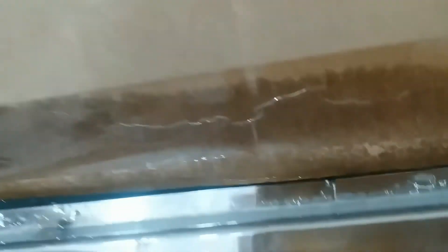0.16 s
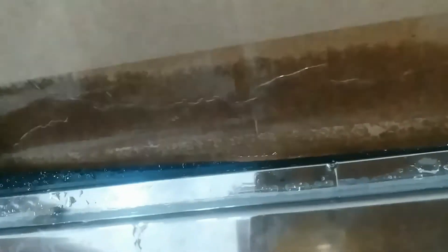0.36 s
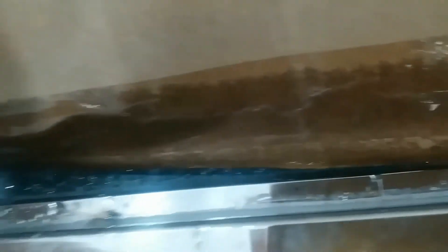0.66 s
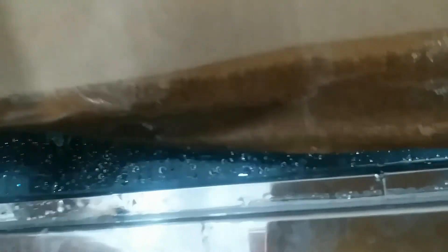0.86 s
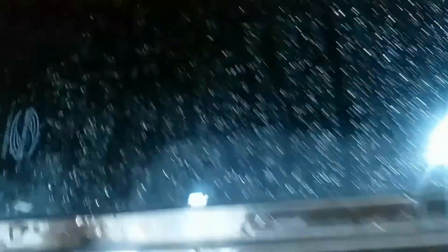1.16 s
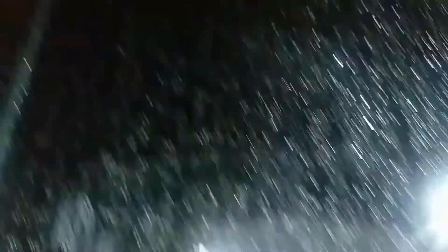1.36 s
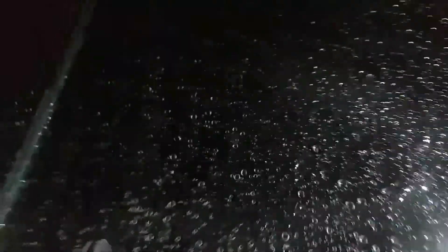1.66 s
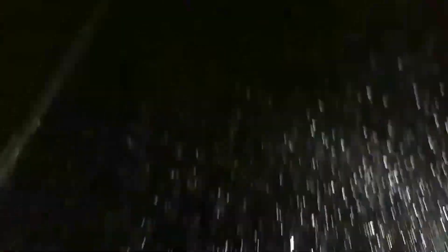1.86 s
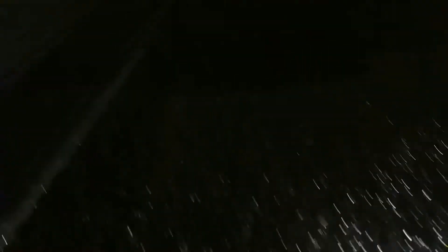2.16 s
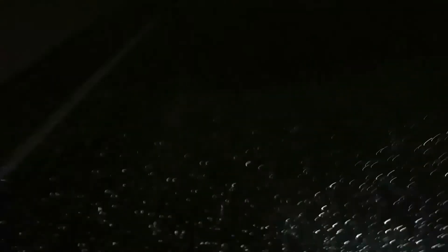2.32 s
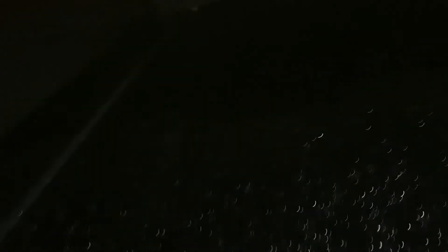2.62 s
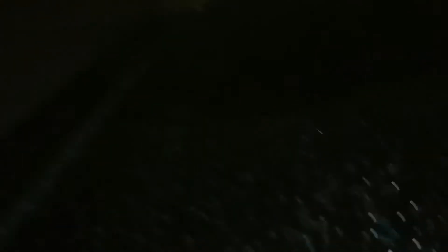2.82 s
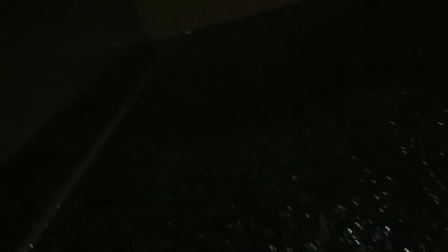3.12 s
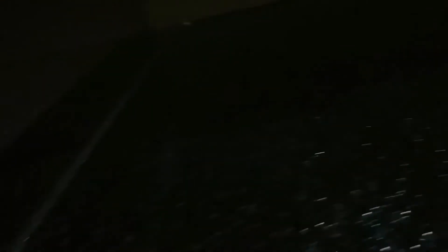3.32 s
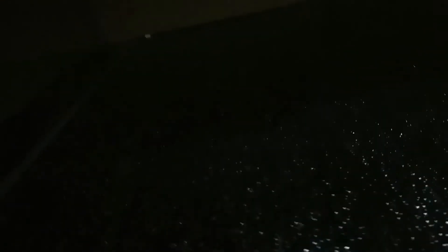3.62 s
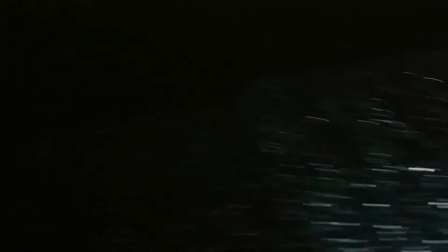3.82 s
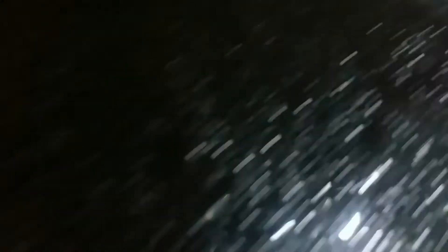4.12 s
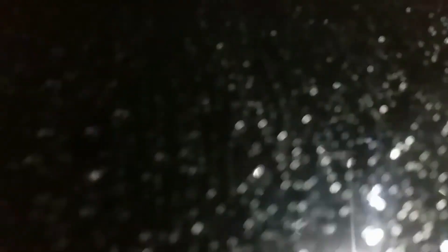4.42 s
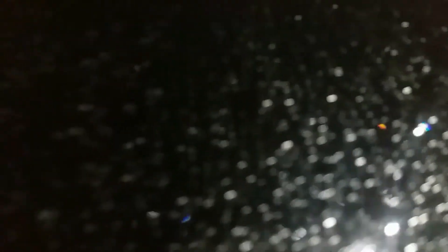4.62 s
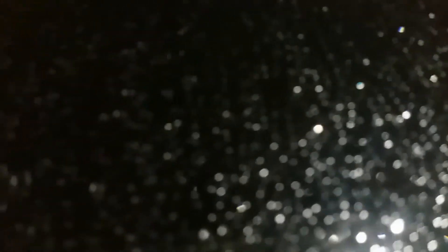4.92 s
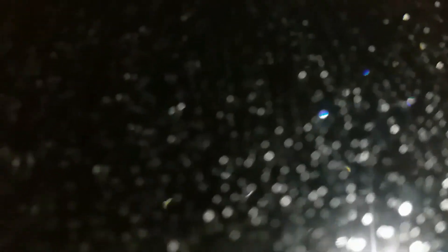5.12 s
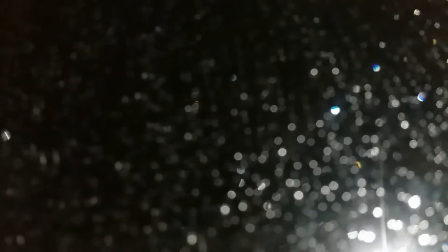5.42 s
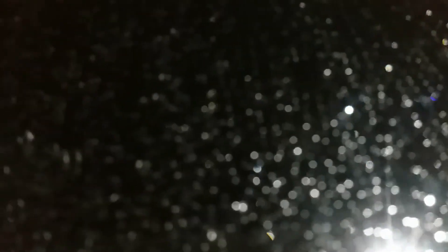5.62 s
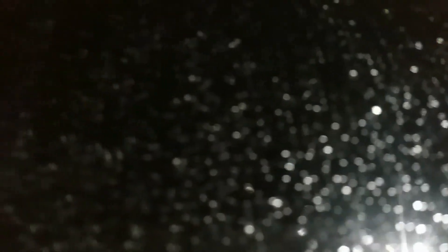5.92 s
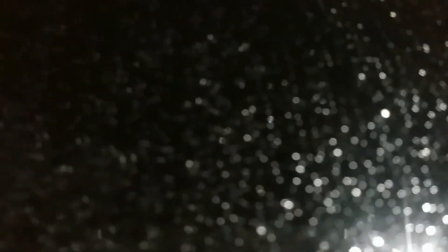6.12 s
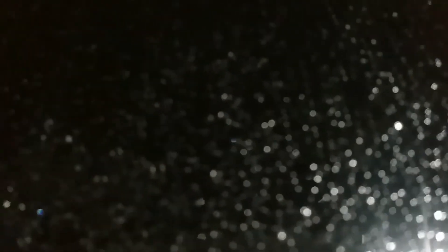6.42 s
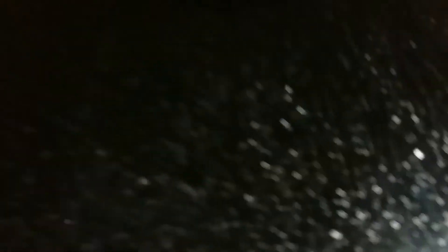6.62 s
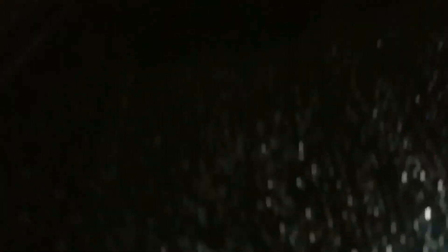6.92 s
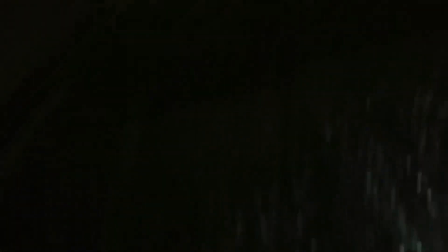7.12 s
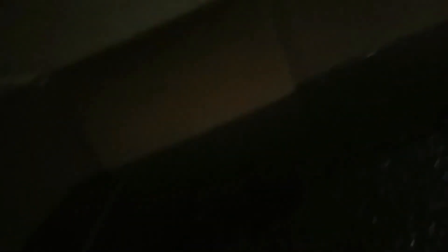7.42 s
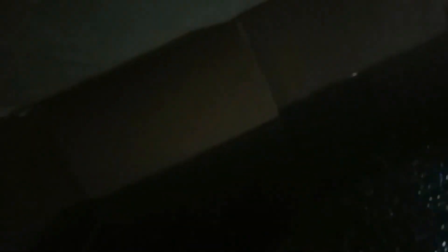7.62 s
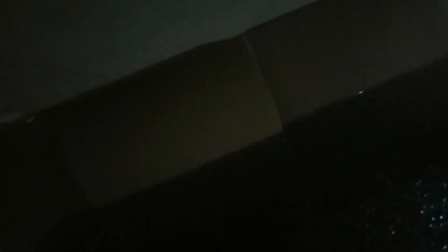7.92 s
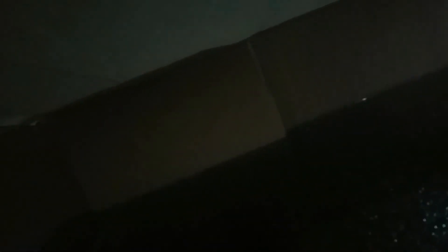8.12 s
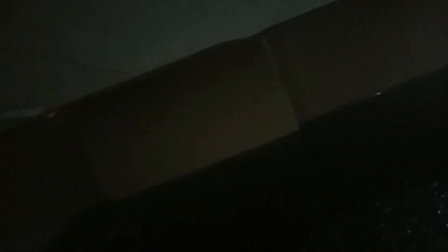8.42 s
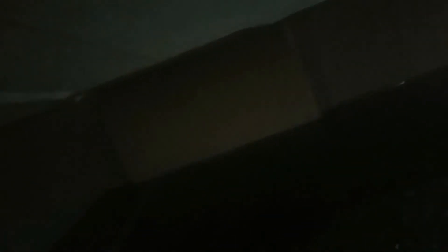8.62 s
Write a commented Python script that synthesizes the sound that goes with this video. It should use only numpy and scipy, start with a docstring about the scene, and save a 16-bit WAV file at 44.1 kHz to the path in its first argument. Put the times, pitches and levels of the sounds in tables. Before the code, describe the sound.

Taped cardboard rustles and clatters loudly aside at a window, then heavy hollow drips thud about once a second over light pattering rain.

```python
"""A room at a window covered with taped cardboard, with light rain falling outside.
The cardboard rustles, is pushed aside with a loud clatter and later settles back: filtered noise
for rubbing, ringing modes for the frame, sparse grains for the crackle, sharp swings for the tape.
A heavy drip thuds on a hollow ledge about once a second, built from decaying sines.
Fine drops tick on the sill as short sprays of noise, one rings on metal, and a soft wash lies behind."""
import sys
import numpy as np
from scipy import signal
from scipy.io import wavfile

SR = 44100
rng = np.random.default_rng(int(sys.argv[2]) if len(sys.argv) > 2 else 0)


def inscribe(sig):
    """Save sig as 16-bit PCM at rate SR to the path in sys.argv[1].

    A 1-D sig is mono; a 2-D sig holds one channel per row.
    Samples are clipped to [-1, 1] before scaling.
    """
    pcm = np.round(np.clip(np.atleast_2d(sig).T, -1, 1) * 32767)
    wavfile.write(sys.argv[1], SR, pcm.astype(np.int16))


N = 386104

# Cardboard bumping the frame: (time [s], knock level [dB], contact pitch [Hz], crackle level [dB])
BUMP_EVENTS = [(.134, -24.5, 600, -50), (1.1128, -11.5, 710, -34.5), (1.181, -10, 510, -37),
               (1.197, -7.5, 560, -30), (1.211, -5.5, 170, -17), (1.237, -13, 760, -23),
               (1.258, -9.5, 340, -25.5), (1.347, -16.5, 560, -22.5), (1.392, -17.5, 150, -30),
               (2.474, -44, 900, -45.5), (5.801, -42.5, 400, -44.5), (7.51, -32.5, 179, -41),
               (7.642, -30.5, 330, -37.5), (8.193, -30, 240, -41), (8.717, -32.5, 196, -55)]
# Ringing modes of the frame: (frequency [Hz], relative level [dB], t60 [s])
FRAME_MODES = [(101.4, -6, 0.26), (117, -4, 0.22), (141, -1.5, 0.062), (166, -28, 0.091), (182.6, 3, 0.07),
               (309.7, 0, 0.132), (373.5, 1, 0.17), (427, -1, 0.1), (513, -5, 0.064), (566, -4.5, 0.058),
               (641, 1, 0.037), (732, 0, 0.063), (864, -1, 0.025), (1204, -6.5, 0.027), (1600, -3.5, 0.016),
               (2180, -31, 0.044)]
# Resonances of the crackling cardboard: (frequency [Hz], width [Hz], relative level [dB])
SHEET_RESONANCES = [(394, 73, -6.5), (753, 120, -3), (1253, 48, -11), (1850, 200, -8.5), (2080, 140, -4),
                    (2324, 220, -6), (4000, 1400, -7), (5070, 1100, -18)]
# Hiss of the crackling fibres: (frequency [Hz], relative density [dB per Hz])
CRACKLE_SPECTRUM = [(300, -5), (750, -4.5), (1400, 4.5), (2300, -8), (3100, -17), (4400, -7), (6000, -11),
                    (8000, -34), (11000, -36), (16000, -33)]
# Hum left in the pane by a hard blow: (time [s], frequency [Hz], level [dB], t60 [s])
PANE_HUMS = [(1.209, 150.4, -20.5, 1.12)]
# Stiff tape letting go: (time [s], level [dB], pitch [Hz])
TAPE_SNAPS = [(7.6424, -11, 1130), (7.6923, -26.5, 1390), (8.7196, -23.5, 1580)]
# The sheet pushed aside: (time [s], relative rubbing level [dB], rumble level [dB])
PUSH_CURVE = [(0, -42.5, -52), (.5, -43.5, -55), (.95, -55, -58), (1.15, -35.5, -53), (1.5, -44, -34),
              (1.62, -51, -52), (1.83, -44, -61), (2.05, -79, -70)]
# The sheet settling back: (time [s], relative rubbing level [dB], rumble level [dB])
SETTLE_CURVE = [(7.15, -62, -62), (7.27, -46, -43), (7.4, -49, -56), (7.55, -41.5, -47), (7.8, -46, -62),
                (8.05, -41.5, -51), (8.28, -44, -42.5), (8.48, -46, -55.5), (8.76, -46.5, -49)]
# Quick swishes along the frame: (time [s], half length [s], relative level [dB])
SWISHES = [(0.02, 0.062, -45.5), (0.15, 0.025, -35.5), (0.335, 0.078, -43), (0.625, 0.023, -42.5),
           (0.826, 0.031, -45), (1.181, 0.027, -31.5), (7.982, 0.056, -45), (8.595, 0.031, -51.5)]
# Rubbing of sheet on frame: (frequency [Hz], relative density [dB per Hz])
RUB_SPECTRUM = [(200, -0.5), (450, -0.5), (1000, -3.5), (1500, -2), (2200, -2), (3200, -14), (5000, -8),
                (9000, -53)]
# Fine hiss of brushing cardboard: (frequency [Hz], relative density [dB per Hz])
BRUSH_SPECTRUM = [(1500, -27), (3000, 2.5), (4800, -3), (8000, -3.5), (12000, -4.5), (16000, -6.5)]
# An edge scuffing along the frame: (time [s], half length [s], level [dB], pitch [Hz])
EDGE_SCUFFS = [(7.282, 0.053, -49, 3740), (8.053, 0.013, -38, 1390), (8.101, 0.023, -43, 850),
               (8.668, 0.015, -44, 900)]
# Ringing modes of the hollow ledge: (frequency [Hz], relative level [dB], t60 [s])
LEDGE_MODES = [(104, -29, .2), (134, -33, 0.15), (204.8, -26, 0.16), (180.2, -15.5, 0.21),
               (290, -19, 0.084), (347, -26, 0.16), (430, -15.5, 0.038), (436, 0, 0.012),
               (680.6, -40, 0.15), (717, -35, 0.055), (1098, -36.5, 0.048)]
# Drops striking metal: (time [s], relative level [dB])
METAL_DROPS = [(6.0408, -28.5)]
# Ringing modes of the metal: (frequency [Hz], relative level [dB], t60 [s])
METAL_MODES = [(1830, -19, 0.072), (1997, 4.5, 0.036), (2220, -7, .05), (2275, -4, 0.059), (2655, -13, .06),
               (3580, -12, .03), (4470, -12, 0.03)]
# Loudest drops on the sill: (time [s], relative level [dB], pitch [Hz])
NEAR_DROPS = [(0.053, -29.5, 5690), (1.6116, -32.5, 9150), (2.2625, -29, 5600), (2.539, -35.5, 11100),
              (2.858, -38.5, 12400), (2.9326, -36, 8330), (2.99, -38.5, 3560), (3.1497, -35.5, 8000),
              (3.886, -33, 12100), (4.0681, -35.5, 8530), (4.134, -33.5, 5770), (4.326, -35.5, 4340),
              (4.359, -31.5, 4250), (4.429, -35, 12000), (4.563, -35.5, 5940), (4.9272, -32.5, 5950),
              (5.0084, -35, 12200), (5.7106, -30, 11500), (6.192, -34.5, 4200), (6.2441, -34, 4370),
              (6.8423, -36, 4370), (6.938, -35.5, 4190), (7.039, -35, 3740), (7.1034, -28.5, 3280),
              (7.4754, -30.5, 10400), (7.6547, -25, 4180), (7.796, -32, 11800), (8.195, -30, 5860)]
# Distant rain wash: (frequency [Hz], relative density [dB per Hz])
RAIN_SPECTRUM = [(30, -46), (50, -1.5), (80, 2), (130, 1), (200, 0.5), (320, -3.5), (550, -2.5), (850, -4),
                 (1300, -6), (2200, -7.5), (3500, -9.5), (6000, -15.5), (9500, -18.5), (16000, -19.5)]
# The window recess ringing with the rain: (frequency [Hz], width [Hz], level [dB])
RECESS_RESONANCES = [(117.4, 7.8, -64), (486.6, 13, -61.5), (680, 42, -67.5), (1860, 210, -63.5),
                     (11750, 870, -68)]
# How alike the two ears are: (frequency [Hz], left-right correlation [-1 to 1])
EAR_LIKENESS = [(50, 0.96), (150, 0.82), (300, 0.73), (600, 0.44), (1200, -0.32), (3000, 0.057),
                (12000, -0.083)]

CRACKLE_T60_S = 0.098
# Flexing after a bump: a harder bump makes it only somewhat louder (dB per dB of knock)
WOBBLE_DB, WOBBLE_FOLLOWS, WOBBLE_RISE_S, WOBBLE_HZ = -20.5, 0.64, 0.027, 134.5
STROKE_RUB_DB, SLOW_BRUSH_DB = -1.5, -10.5  # rubbing within a swish; hiss within slow rubbing
# The drip's beat: each gap is a little longer than the one before
FIRST_DRIP_S, DRIP_GAP_S, GAP_GROWS_S, DRIP_DB = 2.3023, 1.0968, .0048, -0.3
# Dull drops lean to the left, bright ones to the right
MIDDLE_HZ, PAN_DB_PER_OCTAVE = 8500, 1
PATTER_DB, PATTER_SPREAD_DB = -30, 12  # loudest patter drop; how much fainter the farthest is
RAIN_DB = -49.5
LULL_S, LULL_HALF_S, LULL_DB = 3.27, 0.34, -2  # the wash eases once
CUTOFF_HZ = 15900


def bumps(contact_width=1.95, hiss_db=-3, ring_db=-1, left_db=1.5):
    """Each contact favours the frame modes near its own pitch, and the cardboard crackles after it."""
    knocks, crush, t = np.zeros((2, N)), np.zeros((1, N)), seconds(1)
    body = struck(FRAME_MODES, swell_cycles=0.097)
    crackle_shape = fade(t, CRACKLE_T60_S) * (1 - np.exp(-t / 0.0018))
    for s, db, hz, crackle_db in BUMP_EVENTS:
        knock = peak_one(resonance(body, hz, contact_width * hz))
        add(knocks, s, from_db(db) * knock)
        add(crush, s, from_db(crackle_db) * crackle_shape)
    folds = crush * grains(per_s=1400, size_db=3.5)
    ringing = 0
    for hz, width_hz, db in SHEET_RESONANCES:
        even_out = np.sqrt(SR / np.pi / width_hz)  # a narrow band would otherwise come out quieter
        ringing = ringing + from_db(db) * even_out * resonance(folds, hz, width_hz)
    flicker = rms_one(from_db(4.6 * drift(250)))
    hiss = crush * flicker * banded_noise(CRACKLE_SPECTRUM, patchy_db=1.5)
    crackle = from_db(ring_db) * ringing + from_db(hiss_db) * hiss
    lean_left = from_db([[left_db], [-left_db]])
    return room(knocks + crackle * lean_left, wet_db=-0.5, t60=0.24)


def wobble():
    """A low boom swells after each bump and dies away as the flexing sheet comes to rest."""
    power, age = np.zeros((1, N)), seconds(1) / WOBBLE_RISE_S
    swing = age * np.exp(1 - age)
    for s, db, _, _ in BUMP_EVENTS:
        add(power, s, (from_db(WOBBLE_DB + WOBBLE_FOLLOWS * db) * swing) ** 2)
    return np.sqrt(power) * flexing(WOBBLE_HZ)


def struck_pane():
    """The glass rings on after the blow; two close modes beat."""
    out, t = np.zeros((2, N)), seconds(1.5)
    for s, hz, db, t60 in PANE_HUMS:
        pair = np.sin(2 * np.pi * hz * t) + 0.13 * np.sin(2 * np.pi * (hz - 8.5) * t)
        add(out, s, from_db(db) * pair * fade(t, t60))
    return out


def snaps(width=0.9):
    """Tape lets go with one sharp swing: a click through two broad resonances."""
    out, click = np.zeros((2, N)), signal.unit_impulse(SR // 20)
    for s, db, hz in TAPE_SNAPS:
        swing = resonance(resonance(click, hz, width * hz), hz, 2 * width * hz)
        add(out, s, from_db(db) * peak_one(swing))
    return room(out, wet_db=-5, t60=0.12)


def sliding(rumble_hz=98, rub_db=-3, brush_db=0.5):
    """The moving sheet rumbles as it flexes, rubs on the frame and brushes with a fine hiss."""
    slow_rub, rumble = np.add(gains(PUSH_CURVE), gains(SETTLE_CURVE))
    swishes = sum(from_db(db) * swell(s, half_length) for s, half_length, db in SWISHES)
    rub = np.hypot(slow_rub, from_db(STROKE_RUB_DB) * swishes)
    brush = np.hypot(swishes, from_db(SLOW_BRUSH_DB) * slow_rub)
    catching = rms_one(from_db(3.2 * drift(100)))  # the surfaces stick and slip unevenly
    rubbing = rub * catching * banded_noise(RUB_SPECTRUM, patchy_db=1.0)
    brushing = brush * banded_noise(BRUSH_SPECTRUM, patchy_db=1.2)
    return rumble * flexing(rumble_hz) + from_db(rub_db) * rubbing + from_db(brush_db) * brushing


def scuffs(width=0.52):
    """Quick runs of tiny slips, coloured by the edge that makes them."""
    slips, out = grains(per_s=2500, size_db=-2.0), 0
    for s, half_length, db, hz in EDGE_SCUFFS:
        coloured = rms_one(resonance(slips, hz, width * hz))
        out = out + from_db(db) * swell(s, half_length) * coloured
    return out


def heavy_drip(echo_s=0.067, echo_db=-21, splat_db=-44, splat_hz=1900, splat_t60=0.28, count=6):
    """Each drip sets the ledge booming, with a faint wet splat and an echo off a wall."""
    out, t = np.zeros((2, N)), seconds(1)
    thud = struck(LEDGE_MODES, swell_cycles=4.75)
    for k in range(count):
        s = FIRST_DRIP_S + k * DRIP_GAP_S + k * (k - 1) / 2 * GAP_GROWS_S
        wet = rms_one(resonance(rng.standard_normal((2, len(t))), splat_hz, 610))
        splat = wet * fade(t, splat_t60)
        add(out, s, from_db(DRIP_DB) * (thud + from_db(splat_db) * splat))
        add(out, s + echo_s, -from_db(DRIP_DB + echo_db) * thud)
    return room(out, wet_db=-5, t60=.25)


def plink(tick_db=-38, tick_t60=0.18):
    """A drop smacks a piece of metal, a little to the left, and leaves its modes ringing."""
    out, t = np.zeros((2, N)), seconds(0.68)
    for s, db in METAL_DROPS:
        tick = rms_one(resonance(rng.standard_normal((2, len(t))), 1300, 3400)) * fade(t, tick_t60)
        add(out, s, from_db(tick_db) * tick)
        ear_gains = from_db(db + np.array([[1], [-2]]))
        add(out, s, ear_gains * struck(METAL_MODES, swell_cycles=0.84))
    return room(out, wet_db=-2.5, t60=0.15)


def sill_drops(near_db=6.5, rebound_db=-9, rebound_s=.025, count=150):
    """Loud near drops among a random patter; each throws a droplet that lands again."""
    out = np.zeros((2, N))
    drops = [(s, db + near_db, hz) for s, db, hz in NEAR_DROPS]
    for when, far, pitch in rng.random((count, 3)):
        drops.append((when * N / SR, PATTER_DB - PATTER_SPREAD_DB * np.sqrt(far), 3500 * 3.6 ** pitch))
    for s, db, hz in drops:
        pan_db = PAN_DB_PER_OCTAVE * np.log2(MIDDLE_HZ / hz)
        gain = from_db(db + pan_db * np.array([[.5], [-.5]]))
        add(out, s, gain * splash(hz))
        add(out, s + rng.uniform(.086, 1) * rebound_s, gain * from_db(rebound_db) * splash(hz))
    return room(out, wet_db=-2.5, t60=0.19)


def splash(hz, t60=0.011, width=0.35, spray_db=-9, low_cut_hz=3300, rise_s=0.00056):
    """A drop bursts: a very short spray of noise with one favoured pitch; peak 1."""
    t = seconds(.02)
    spreading = (1 - np.exp(-t / rise_s)) ** 2
    spray = rng.standard_normal((2, len(t))) * fade(t, t60) * spreading
    pitched = resonance(spray, hz, width * hz)
    return peak_one(high_pass(pitched + from_db(spray_db) * spray, low_cut_hz))


def yard_drops(drop_db=-52, spread_db=8, t60=0.083, count=130):
    """Drops farther off arrive duller, smeared by the walls into soft-edged noise."""
    out, t = np.zeros((2, N)), seconds(.15)
    smear = fade(t, t60) * (1 - np.exp(-t / 0.0045))
    for when, far, pitch in rng.random((count, 3)):
        hz = 1800 * 3.5 ** pitch
        spray = rms_one(resonance(rng.standard_normal((2, len(t))), hz, 1.1 * hz))
        add(out, when * N / SR, from_db(drop_db - spread_db * far) * spray * smear)
    return out


def far_rain():
    """Countless distant drops merge into a wash of noise; the recess rings faintly with it."""
    level = from_db(RAIN_DB + LULL_DB * swell(LULL_S, LULL_HALF_S))
    wash = level * banded_noise(RAIN_SPECTRUM, patchy_db=.7)
    for hz, width_hz, db in RECESS_RESONANCES:
        ringing = resonance(rng.standard_normal((2, N)), hz, width_hz)
        wash = wash + from_db(db) * rms_one(spread_to_ears(ringing, hz))
    return wash


def flexing(hz, width=0.89, side_db=-14):
    """The low boom of a bending sheet, nearly the same at both ears; rms 1."""
    noise = rng.standard_normal((2, N))
    mid, side = resonance(resonance(noise, hz, width * hz), hz, width * hz)
    return rms_one(mid + from_db(side_db) * side * [[1], [-1]])


def grains(per_s, size_db):
    """Sparse clicks at random moments, with random sizes; rms 1."""
    sizes = from_db(size_db * np.minimum(rng.exponential(1, N), 4)) * rng.standard_normal((2, N))
    return rms_one(sizes * (rng.random(N) < per_s / SR))


def struck(modes, swell_cycles):
    """Modes that swell over a few cycles or less, then die away."""
    t, out = seconds(1), 0
    for k, (hz, db, t60) in enumerate(modes):
        shape = fade(t, t60) * (1 - np.exp(-t * hz / swell_cycles))
        out = out + (-1) ** k * from_db(db) * np.sin(2 * np.pi * hz * t) * shape
    return out


def banded_noise(spectrum, patchy_db):
    """Half-octave bands of stereo noise, each with its own flicker and likeness; rms 1."""
    out, edges = 0, 25 * 2 ** np.arange(0, 9.6, .5)
    white = rng.standard_normal((2, 2, N))  # neighbouring bands take turns with two sources
    for k, (low, high) in enumerate(zip(edges, edges[1:])):
        hz = np.sqrt(low * high)
        if spectrum[0][0] / 2 < hz < spectrum[-1][0] * 2:
            band_filter = signal.butter(2, [low, high], "band", fs=SR, output="sos")
            band = signal.sosfilt(band_filter, white[k % 2])
            gain = from_db(at_hz(spectrum, hz) + patchy_db * drift(16))
            out = out + gain * spread_to_ears(band, hz)
    return rms_one(out)


def spread_to_ears(pair, hz):
    """Mix two independent noises into left and right with the correlation for this pitch."""
    mid, side = pair
    alike = np.clip(at_hz(EAR_LIKENESS, hz), -1, 1)
    return np.sqrt(1 + alike) * mid + np.sqrt(1 - alike) * side * [[1], [-1]]


def room(x, wet_db, t60):
    """Direct sound plus diffuse reflections, different at each ear; the bass stays dry."""
    t = seconds(.5)
    tail = high_pass(rng.standard_normal((2, len(t))), 377) * fade(t, t60) * (1 - np.exp(-t / 0.0022))
    reflections = signal.fftconvolve(x, rms_one(tail) / np.sqrt(len(t)), axes=1)[:, :N]
    return x + from_db(wet_db) * reflections


def drift(rate_hz):
    """Slow random wandering with spread 1: low-passed noise drawn every 40 samples."""
    r = np.exp(-80 * np.pi * rate_hz / SR)
    noise = rng.standard_normal(N // 40 + 2002)
    slow = signal.lfilter([1], [1, -2 * r, r * r], noise)[2000:]  # skip the filter's start
    return np.interp(np.arange(N) / 40, np.arange(len(slow)), rms_one(slow))


def swell(s, half_length):
    """A smooth bell-shaped rise and fall around time s."""
    return np.exp(-np.minimum(((np.arange(N) / SR - s) / half_length) ** 2 / 2, 20))


def gains(curve):
    """A curve of levels as one gain per column, practically silent outside its span."""
    s, *columns = np.transpose(curve)
    return [from_db(np.interp(np.arange(N) / SR, s, db, left=-120, right=-120)) for db in columns]


def resonance(x, hz, width_hz):
    """Two-pole band-pass with gain 1 on top."""
    hz = min(hz, SR / 2 - 1000)
    width_hz = min(width_hz, SR / 2 - 2000)
    return signal.lfilter(*signal.iirpeak(hz, hz / width_hz, fs=SR), x + 1e-18)


def high_pass(x, hz):
    """Second-order low cut."""
    return signal.sosfilt(signal.butter(2, hz, "high", fs=SR, output="sos"), x + 1e-18)


def from_db(db):
    """Decibels to gain."""
    return 10 ** (np.asarray(db) / 20)


def rms_one(x):
    """Scale to unit rms."""
    return x / np.sqrt(np.mean(x ** 2) + 1e-20)


def peak_one(x):
    """Scale to unit peak."""
    return x / np.abs(x).max()


def seconds(length):
    """A time axis."""
    return np.arange(int(length * SR)) / SR


def fade(t, t60):
    """Exponential decay by 60 dB in t60."""
    return np.exp(-np.log(1000) * t / t60)


def at_hz(points, hz):
    """Read a curve on a log-frequency axis."""
    return np.interp(np.log(hz), np.log(np.array(points)[:, 0]), np.array(points)[:, 1])


def add(out, s, sound):
    """Mix a sound in at time s."""
    i = min(max(int(s * SR), 0), N)
    out[:, i:i + sound.shape[-1]] += sound[..., :N - i]


def scene():
    """Cardboard close by, drips and drops at the window, rain behind."""
    cardboard = bumps() + wobble() + struck_pane() + snaps() + sliding() + scuffs()
    rain = heavy_drip() + plink() + sill_drops() + yard_drops() + far_rain()
    return cardboard + rain


def record(dry):
    """Peaks are softly rounded and the treble above the cutoff is removed."""
    rounded = .85 * np.tanh(dry / .85)
    return signal.sosfilt(signal.ellip(10, .2, 70, CUTOFF_HZ, fs=SR, output="sos"), rounded)


dry = scene()
out = record(dry)
inscribe(out)
```